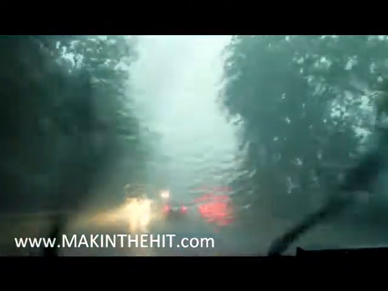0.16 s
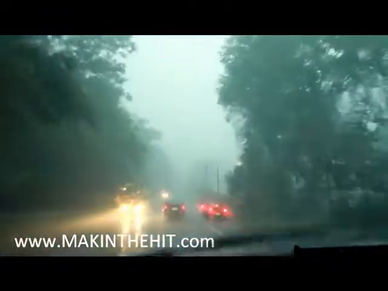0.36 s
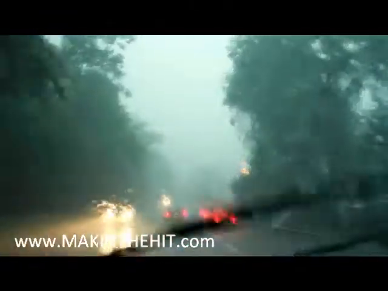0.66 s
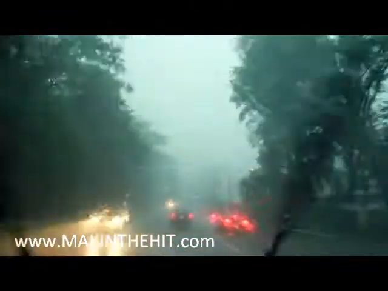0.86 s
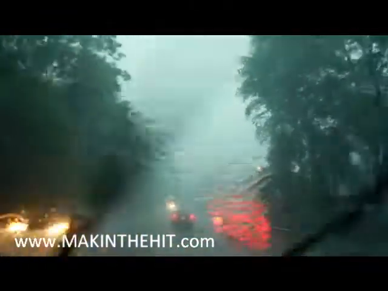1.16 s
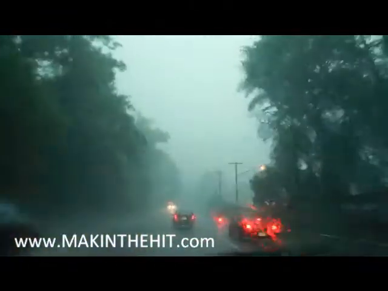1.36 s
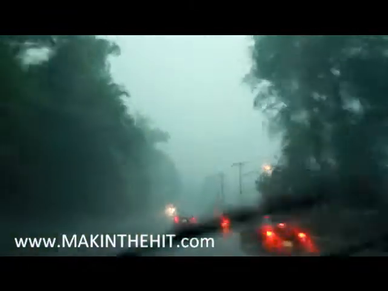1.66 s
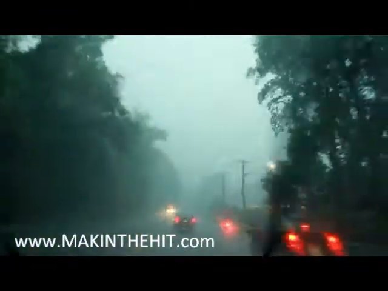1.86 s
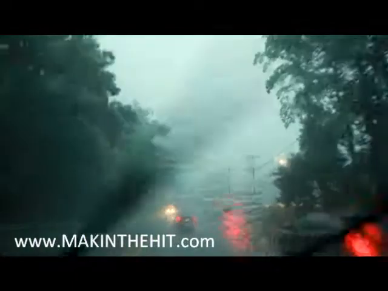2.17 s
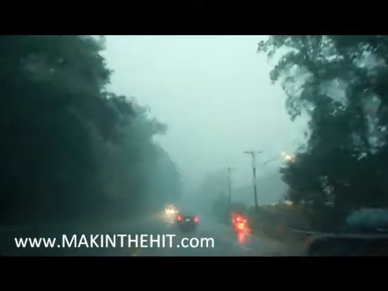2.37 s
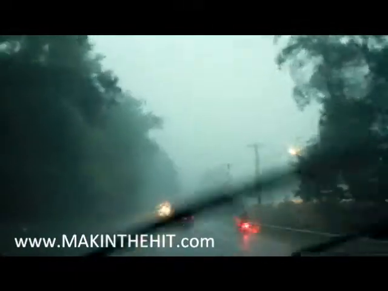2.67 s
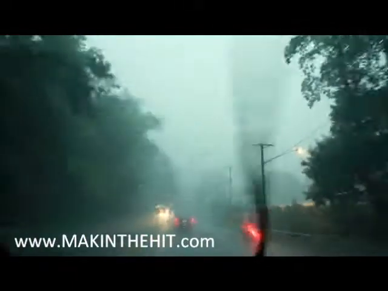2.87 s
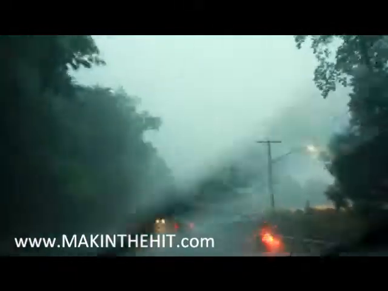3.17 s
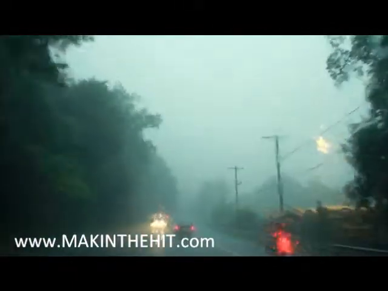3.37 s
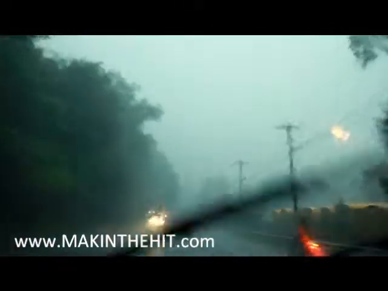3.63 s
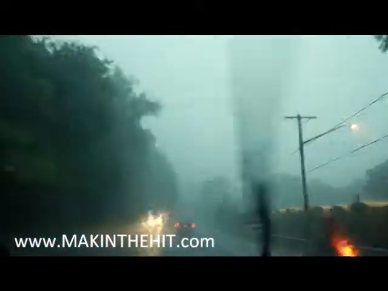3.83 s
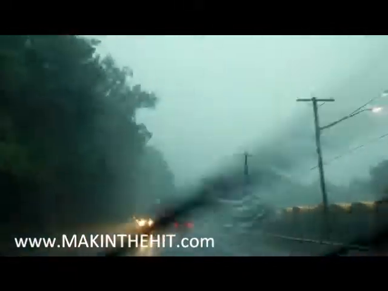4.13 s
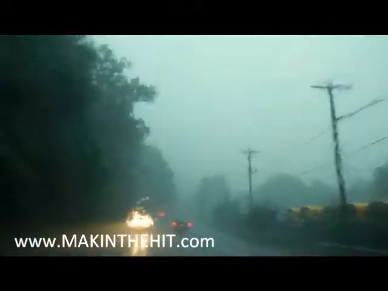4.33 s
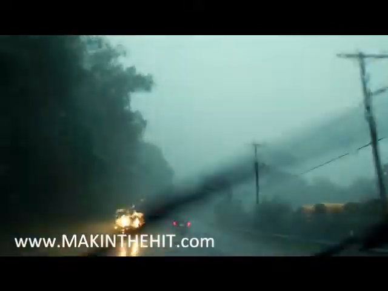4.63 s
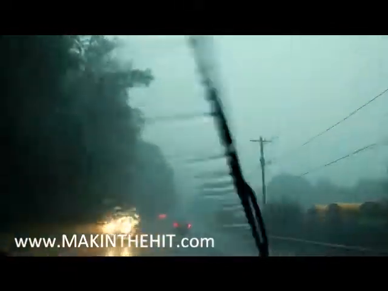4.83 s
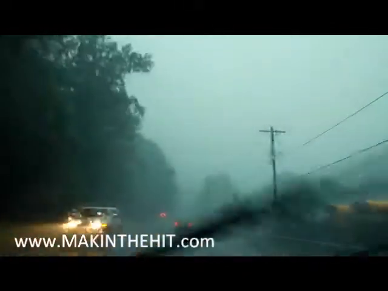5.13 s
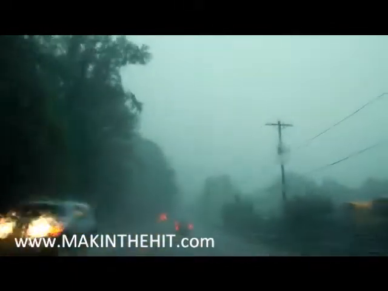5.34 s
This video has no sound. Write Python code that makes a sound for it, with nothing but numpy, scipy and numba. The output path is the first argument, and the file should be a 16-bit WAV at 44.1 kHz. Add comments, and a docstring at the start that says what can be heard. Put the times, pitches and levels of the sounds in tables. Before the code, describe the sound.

The listener sits inside a car driving through heavy rain and hail. A continuous hiss and dense patter cover the glass and roof, with fine ticks, taps and muffled drumming. The first half second is relatively restrained, with soft roof knocks and light stones. From about 0.65 to 1.05 seconds several violent, bright cracks hit the windshield, some overloading the microphone, with hollow thuds above; the overall level ducks and slowly recovers. More raps come around 1.3 to 1.65 seconds, another hard snap at 2.4, and a busy run of clicks and roof knocks from 2.5 to 3.2. Spaced strikes follow, including a sharp one near 3.9 and clusters around 4.2 to 4.8. After 5.2 seconds rain and boom swell with renewed cracks. Boxy cabin resonance fills the low range, while deep road shudder comes and goes. The sound is close, mono and slightly dull at the very top.

```python
"""Cloudburst and hail in a car

Rain patters on windscreen and roof as noise bursts filtered by the modes of the panels, over a smooth hiss.
Hailstones crack on the glass as struck resonances whose highs arrive first, and thud on the roof as decaying sines.
Noise through low resonances gives the cabin's boom and the road's rumble.
The camera's gain control ducks after each hard stone and climbs back slowly."""
import sys
import numpy as np
from scipy import signal
from scipy.fft import rfft, irfft
from scipy.io import wavfile
from scipy.ndimage import uniform_filter1d
from numba import njit

SR = 44100
rng = np.random.default_rng(int(sys.argv[2]) if len(sys.argv) > 2 else 0)


def convert_level_to_amplitude(level_db):
    """Map a level in decibels to its linear amplitude factor."""
    exponent = np.asarray(level_db, float) / 20
    return 10 ** exponent


def int16_out(signal):
    """Quantize to a 16-bit WAV file."""
    q = np.round(np.clip(np.atleast_2d(signal).T, -1, 1) * 32767)
    wavfile.write(sys.argv[1], SR, q.astype(np.int16))


N = 242550  # samples, 5.5 s
HIT_SAMPLES = 6144  # length of one blow's sound

# Blows on the glass at set times; rows at one time are partials of one blow:
# (time [s], peak before gain control [dB], treble gain [dB], ring t60 [s],
# mode under the stone [Hz], gain of that mode over the pane's peak [dB])
GLASS_BLOWS = [(0.342, -9, -3, 0.028, 2570, -11), (0.652, 9, -3, 0.0079, 3090, -8.5),
               (0.6545, -4.5, 2, 0.033, 4370, 4), (0.7398, -13, 9, 0.025, 3000, -12),
               (0.7696, 12, -3, 0.022, 2970, -7.5), (0.7759, 7, 2, 0.055, 2950, -3),
               (0.8106, 7, 2, 0.081, 2700, 1), (1.0011, -4.5, -9, 0.067, 3400, -15),
               (1.0152, 7, 0.5, 0.09, 3870, 3), (1.0152, 4, -12, 0.056, 1880, 9),
               (1.0152, 8.5, 10, 0.04, 5700, 4), (1.3074, -1, -5, 0.12, 5000, -10),
               (1.3116, -1, -34, 0.034, 1585, 4), (1.3168, 6, 5.5, 0.025, 5180, -6),
               (1.447, -6, 2, 0.16, 2430, 3), (1.632, -4.5, 4, 0.039, 3030, -19),
               (1.6636, -5.5, -6, 0.086, 1530, -0.5), (1.904, -8, 1, 0.048, 4340, 0),
               (2.0982, -9.5, 1, 0.18, 3270, 0), (2.403, -26, 11, 0.032, 5360, -24),
               (2.4177, 6.5, 1.5, 0.016, 3330, -12), (2.53, -6.5, -2, 0.043, 4430, -2),
               (2.5325, -15, -10, 0.04, 3440, 2), (2.5642, -11, 1, 0.075, 5970, -13),
               (2.6293, -5.5, 1, 0.035, 2200, 1), (2.633, -8, -1, 0.038, 2490, 6),
               (2.688, -8, -4, 0.035, 2480, -2), (2.7407, -4, -16, 0.074, 4980, -4),
               (2.9018, -9.5, -13, 0.078, 3880, 3), (3.0025, -8.5, -10, 0.018, 2800, -5),
               (3.0435, -9, 4, 0.02, 3500, -14), (3.058, -11.5, 4, 0.05, 3490, -8),
               (3.069, -16, 2, 0.018, 4500, -10), (3.0745, -9, 12, 0.033, 3580, -13),
               (3.0885, -5, 4, 0.043, 2580, -15), (3.152, -9, -8, 0.073, 3000, -4),
               (3.169, -3, 3, 0.041, 4200, -13), (3.3795, -10.5, 1, 0.18, 1830, -12),
               (3.858, -13, -6, 0.05, 4520, -8), (3.8645, -12, 7, 0.064, 3160, -7.5),
               (3.867, 1.5, -0.5, 0.019, 4220, -5), (3.8705, -11, -11, 0.027, 3500, -2),
               (4.153, -22, 10, 0.016, 6000, -7), (4.198, -24, 11, 0.014, 6040, -12),
               (4.2338, -7, 2, 0.048, 2420, 4), (4.2966, -10.5, -20.5, 0.045, 3100, 6),
               (4.309, -2.5, 4, 0.03, 3700, -8), (4.401, -13, -0.5, 0.08, 3320, -10),
               (4.4103, -6, -4, 0.025, 4050, -7), (4.4763, -10, 4, 0.015, 2660, -3),
               (4.5101, -14, 0, 0.041, 3170, -6), (4.637, -8.5, -1, 0.016, 2570, 9),
               (4.7974, -10, 4, 0.1, 2400, 6), (4.8308, -11.5, 1, 0.031, 4090, -6),
               (5.2487, -12, 11, 0.042, 3650, 8), (4.945, -17, -4, 0.051, 3280, -7),
               (5.287, -2, -6, 0.025, 3230, -6), (5.3512, 1, 2, 0.018, 5440, -16),
               (5.367, 2, -3, 0.037, 2520, -5)]
# Blows on the roof; rows at one time are partials of one blow:
# (time [s], peak before gain control [dB], panel pitch [Hz], ring t60 [s],
# peak of the whole roof over the panel sine [dB])
ROOF_BLOWS = [(0.015, -26, 460, 0.18, -5), (0.095, -36.5, 490, 0.092, -15), (0.125, -19.5, 318, 0.13, 2),
              (0.258, -18, 345, 0.15, -7), (0.347, -35, 495, 0.14, -9), (0.508, -14, 474, 0.11, 2),
              (0.51, -16.5, 329, 0.24, -1), (0.578, -12.5, 389, 0.1, 0), (0.775, -4, 345, 0.34, 5),
              (1.009, -1.5, 370, 0.057, -6), (1.308, -1.5, 434, 0.26, 14.5), (1.446, -3, 459, 0.12, 9),
              (1.998, -12.5, 371, 0.092, -20), (2.634, -3.5, 440, 0.13, 8), (2.641, -6.5, 207, 0.2, -3),
              (2.684, -12, 170, 0.18, -20), (2.747, -8, 316, 0.084, -1), (3.595, -6.5, 453, 0.041, -1.5),
              (3.912, -5.5, 557, 0.048, -8), (4.232, -9, 446, 0.061, 6.5), (4.799, -12, 345, 0.27, 15),
              (4.832, -8.5, 366, 0.062, 3), (5.095, -13, 446, 0.079, 11), (5.2485, -7, 494, 0.22, -20),
              (5.2485, -12.5, 584, 0.15, -10)]
# Stones on the glass at random times, mean and scatter: (peak before gain control [dB], treble gain [dB],
# ring t60 [s], mode under the stone [Hz], gain of that mode over the pane's peak [dB])
RANDOM_STONE_MEAN = (-17, -3, .028, 3300, -9)
RANDOM_STONE_SCATTER = (1.5, 4, .006, 750, 3)
# Resonances of the pane: (frequency [Hz], width [Hz], gain [dB])
PANE_MODES = [(920, 110, -1), (1960, 1330, 2), (2570, 500, 5.5), (3550, 490, 8), (4730, 1450, 4),
              (5730, 2400, -1.5), (3100, 2600, -3)]
# Treble resonances of cracks and microphone: (frequency [Hz], width [Hz], gain [dB])
TREBLE_RESONANCES = [(6970, 1720, -1.5), (10660, 8800, -5), (12190, 1530, 1)]
# Resonances of the roof: (frequency [Hz], width [Hz], gain [dB])
ROOF_RESONANCES = [(345, 41, -6.5), (403, 286, -5), (443, 130, -2), (588, 13, -14), (790, 50, -14)]
# Low air modes of the cabin: (frequency [Hz], width [Hz], gain [dB])
CABIN_AIR_MODES = [(112.5, 43, -7), (145.3, 49, -1.5), (177, 77.4, -7)]
# Spectrum of rain through glass and trim: (frequency [Hz], relative density [dB per Hz])
RAIN_SPECTRUM = [(120, -34), (200, -15), (339, 0), (565, -5.5), (846, -9.5), (1220, -9.5), (1740, -12),
                 (3170, -8.5), (6990, -24), (11000, -26), (14000, -28.5)]
# Level of the rain over time: (time [s], gain on all the rain [dB])
RAIN_LEVEL = [(0, -3.5), (.35, 0), (.55, -3.5), (1.0, 8), (1.3, 4.5), (1.6, 2.5), (1.9, 1), (2.2, 2),
              (2.5, 1.5), (2.75, 5), (2.95, 5), (3.08, 5.5), (3.2, 3.5), (3.4, 1), (3.7, 0), (4, -2),
              (4.2, -1.5), (4.4, -4), (4.65, -2), (4.85, -4), (5.2, 1), (5.5, 11)]
# Level of the cabin boom over time: (time [s], gain on the boom [dB])
BOOM_LEVEL = [(0, -4), (.3, -7.5), (.55, 0), (1.05, 5), (1.3, -1), (2.2, -2.5), (2.5, -0.5), (3.1, 2),
              (4.3, -1.5), (4.9, -1), (5.1, -2.5), (5.3, 3.5), (5.5, 14.5)]
# Road rumble under the floor: (time [s], rms level [dB])
ROAD_RUMBLE = [(0.0, -47), (0.75, -64), (1.0, -52), (2.07, -35), (2.44, -75), (3.06, -36), (3.55, -38),
               (4.17, -64), (4.75, -36.5), (5.15, -34.5), (5.5, -40)]


def level(x, db):
    """Normalization: the root mean square is scaled to db."""
    return x * convert_level_to_amplitude(db) / np.sqrt(np.mean(x ** 2))


def curve(points):
    """Linear interpolation of (time, value) points, one value per sample."""
    return np.interp(np.arange(N) / SR, *np.transpose(points))


def ring(x, modes):
    """Modal superposition: band-pass resonances along the last axis, neighbours in opposite phase."""
    total = 0
    for k, (hz, width, db) in enumerate(modes):
        b, a = signal.iirpeak(hz, hz / width, SR)
        total = total + (-1) ** k * convert_level_to_amplitude(db) * signal.lfilter(b, a, x)
    return total


def colour(x, points):
    """Spectral shaping: a white signal is weighted by (frequency, dB) points joined over log frequency."""
    hz, db = np.transpose(points)
    bins = np.maximum(np.arange(N // 2 + 1) * SR / N, 1)
    weight = convert_level_to_amplitude(np.interp(np.log(bins), np.log(hz), db))
    return irfft(rfft(x) * weight, N)


def walk(rate):
    """Slow random modulation: values held 1 / rate s and averaged twice, with spread near 1."""
    hold = int(SR / rate)
    steps = np.repeat(rng.standard_normal(N // hold + 1), hold)
    return 1.37 * uniform_filter1d(uniform_filter1d(steps, hold), hold)[:N]


def splats(per_s, scatter_db, t60_s):
    """Shot noise: drops land at random, few of them large, each a noise burst of decaying power."""
    lands = rng.random(N) < per_s / SR
    size_db = scatter_db * np.minimum(rng.exponential(size=N), 5)
    power = lands * convert_level_to_amplitude(2 * size_db)
    fade = np.exp(-2 * np.log(1000) / (t60_s * SR))  # power kept per sample
    return np.sqrt(signal.lfilter([1], [1, -fade], power)) * rng.standard_normal(N)


def place(times, peaks_db, sounds):
    """Superposition in time: each sound is added at its moment, scaled to its peak level."""
    out = np.zeros(N + HIT_SAMPLES)
    for s, db, sound in zip(times, peaks_db, sounds):
        i = int(s * SR)
        out[i:i + HIT_SAMPLES] += convert_level_to_amplitude(db) * sound / np.abs(sound).max()
    return out[:N]


@njit
def follow(x, attack, release):
    """Envelope detection: the value charges at one rate and drains at another."""
    y, e = np.empty(len(x)), 0.
    for i in range(len(x)):
        e += (x[i] - e) * (attack if x[i] > e else release)
        y[i] = e
    return y


def glass_stones(blows):
    """Impact on a dispersive plate: ice cracks, the pane rings at its modes, the highs arrive first."""
    s, peak_db, treble_db, t60, hz, spot_db = np.transpose(blows)
    t = np.arange(HIT_SAMPLES) / SR
    fade = convert_level_to_amplitude(-60 * t / t60[:, None])

    # a stone that shatters rings briefly and cracks hard: 10.5 dB more per halving of the ring
    usual_ring_s = 0.033
    crack = convert_level_to_amplitude(11.5 + 10.5 * np.log2(usual_ring_s / t60))[:, None]
    push = crack * (t == 0)
    noise = rng.standard_normal((len(s), 2, HIT_SAMPLES)) * (1 - np.exp(-t / 0.0005))
    pane = ring(push + noise[:, 0] * fade, PANE_MODES)
    treble_fade = fade ** 0.99 + crack * np.exp(-t / 0.00046)
    treble = ring(push + noise[:, 1] * treble_fade, TREBLE_RESONANCES)

    # slow noise roughens the ring of the mode under the stone
    rough_samples = 70
    rough = uniform_filter1d(rng.standard_normal((len(s), HIT_SAMPLES)), rough_samples) * np.sqrt(rough_samples)
    spot_fade = convert_level_to_amplitude(-60 * t / 0.0092) + convert_level_to_amplitude(-14.0) * fade * (0.47 + 0.38 * rough)
    spot = np.sin(2 * np.pi * hz[:, None] * t) * spot_fade
    pane_peak = np.abs(pane).max(axis=1, keepdims=True)
    struck = pane + convert_level_to_amplitude(treble_db)[:, None] * treble + convert_level_to_amplitude(spot_db)[:, None] * spot * pane_peak

    # bending waves: travel time falls as the root of frequency
    travel_s, travel_at_hz = 0.0007, 4040
    bins = np.arange(HIT_SAMPLES // 2 + 1) * SR / HIT_SAMPLES
    spread = np.exp(-4j * np.pi * travel_s * np.sqrt(travel_at_hz * bins))
    return place(s - travel_s / 2, peak_db, irfft(rfft(struck) * spread, HIT_SAMPLES))


def random_stones():
    """Random arrivals: 60 stones on the glass with uniform times and clipped normal scatter."""
    count = 60
    chance = rng.standard_normal((count, len(RANDOM_STONE_MEAN)))
    times = rng.random(count) * N / SR
    return np.column_stack([times, RANDOM_STONE_MEAN + np.clip(chance, -2, 2) * RANDOM_STONE_SCATTER])


def roof_stones():
    """Modal excitation: a dull blow rings a panel mode, its upper neighbours, roof and cabin."""
    s, peak_db, hz, t60, body_db = np.transpose(ROOF_BLOWS)
    t = np.arange(HIT_SAMPLES) / SR
    phase = 2 * np.pi * hz[:, None] * t
    fade_db = -60 * t / t60[:, None]
    panel = np.sin(phase) * convert_level_to_amplitude(fade_db)
    neighbour = np.sin(1.24 * phase) * convert_level_to_amplitude(2 * fade_db - 8.5)  # dies twice as fast
    knock = np.sin(1.5 * phase) * convert_level_to_amplitude(fade_db - 10.0)
    blow = rng.standard_normal((len(s), HIT_SAMPLES)) * np.exp(-t / 0.024)
    roof = ring(blow, ROOF_RESONANCES + CABIN_AIR_MODES + [(1060, 870, -14.5)])
    body = convert_level_to_amplitude(body_db)[:, None] * roof / np.abs(roof).max(axis=1, keepdims=True)
    return place(s, peak_db, panel + neighbour + knock + body)


def rain(strength_db):
    """Shot noise through resonators: dense drops over hiss, pellets, ticks, sharp taps, drumming on the roof."""
    patter = colour(splats(per_s=700., scatter_db=1.5, t60_s=0.031), RAIN_SPECTRUM)
    hiss = colour(convert_level_to_amplitude(1.54 * walk(12)) * rng.standard_normal(N), RAIN_SPECTRUM)
    pellets = ring(splats(per_s=37.0, scatter_db=1.5, t60_s=0.041), PANE_MODES + TREBLE_RESONANCES[:-1])
    # each tick wakes a single mode
    ticks = sum(ring(splats(per_s=93.0, scatter_db=4.0, t60_s=0.0081), [mode])
                for mode in PANE_MODES[1:-1] + TREBLE_RESONANCES[:-1])
    taps = ring(splats(per_s=150., scatter_db=2.0, t60_s=0.0059), PANE_MODES + TREBLE_RESONANCES)
    drumming = sum(ring(splats(per_s=40., scatter_db=2.0, t60_s=0.039), [mode]) for mode in ROOF_RESONANCES)
    # rms levels [dB] before the level curve
    drops = level(patter, -27.5) + level(hiss, -28) + level(drumming, -34)
    impacts = level(pellets, -35) + level(ticks, -35) + level(taps, -36)
    return convert_level_to_amplitude(strength_db) * (drops + impacts)


def cabin(boom_db):
    """Cavity resonance: road and heavy drops shake the low air modes of the cabin."""
    shake = splats(per_s=41.0, scatter_db=2.5, t60_s=0.11) + 0.91 * rng.standard_normal(N)
    boom = ring(ring(shake, CABIN_AIR_MODES), [(114, 1400, 0)])
    return convert_level_to_amplitude(boom_db) * level(boom, -29.5)  # rms before the level curve


def road():
    """Forced resonance: noise shakes the body on its springs in a low shudder of changing level."""
    shudder = ring(rng.standard_normal(N), [(46, 10, 1.5), (83, 62, -1.5)])
    shudder = ring(shudder, [(54, 100, 0)])
    return level(shudder, 0) * convert_level_to_amplitude(curve(ROAD_RUMBLE))


def scene():
    """Superposition: hail, rain, cabin and road add at one microphone."""
    hail = glass_stones(GLASS_BLOWS) + glass_stones(random_stones()) + roof_stones()
    mix = rain(curve(RAIN_LEVEL)) + cabin(curve(BOOM_LEVEL)) + road() + hail
    return mix[None]


def band_limit(x):
    """A steep low-pass at the top of the band."""
    return signal.sosfilt(signal.butter(12, 15980, fs=SR, output="sos"), x)


def record(dry):
    """Feedforward compression: a quick and a slow memory set the gain; what passes before it reacts is clipped."""
    over = np.maximum(np.abs(dry[0]) - convert_level_to_amplitude(-9.0), 0)
    quick = follow(over, 1 / (0.00045 * SR), 1 / (0.07 * SR))
    slow = follow(quick, 1 / (0.1 * SR), 1 / (0.4 * SR))
    gain = 1 / (1 + convert_level_to_amplitude(19.0) * quick + convert_level_to_amplitude(11.0) * slow)
    # the gain itself lags by 12 ms, so the crack gets through
    lag = 1 / (0.012 * SR)
    gain = signal.lfilter([lag], [1, lag - 1], gain - 1) + 1
    heard = signal.sosfilt(signal.ellip(12, 0.3, 70, 13900, fs=SR, output="sos"), dry)
    clipped = np.clip(heard * gain, -0.5, 0.5)
    # a second low-pass removes the highest products of clipping
    finished = signal.sosfilt(signal.cheby2(10, 60, 15900, fs=SR, output="sos"), clipped)
    return band_limit(finished)


dry = scene()
out = record(dry)
int16_out(out)
```